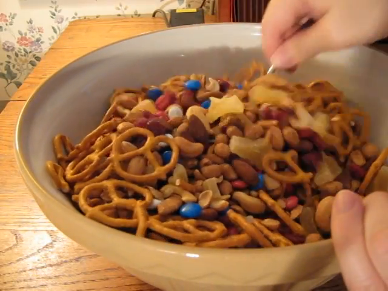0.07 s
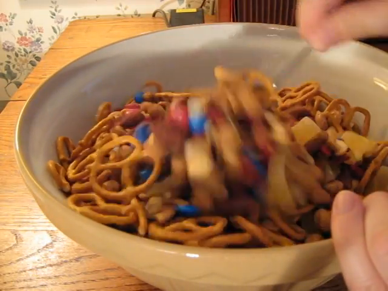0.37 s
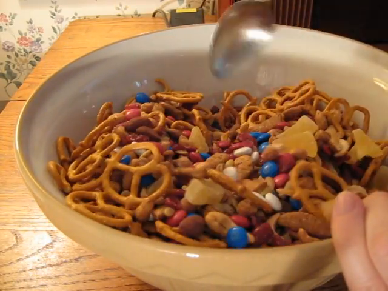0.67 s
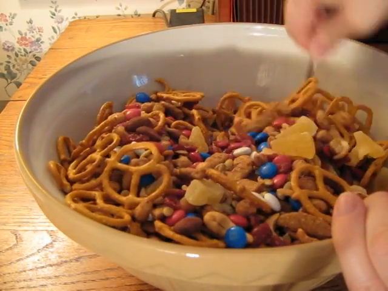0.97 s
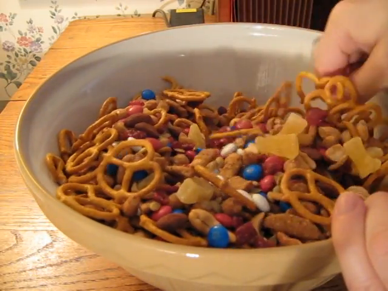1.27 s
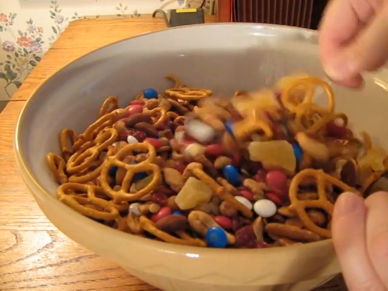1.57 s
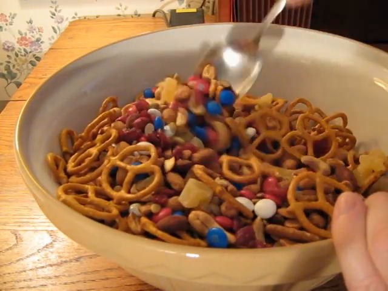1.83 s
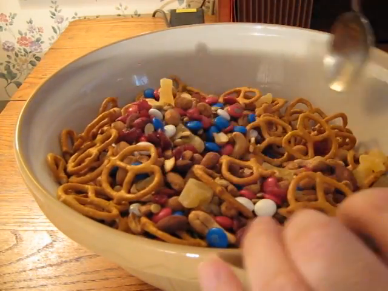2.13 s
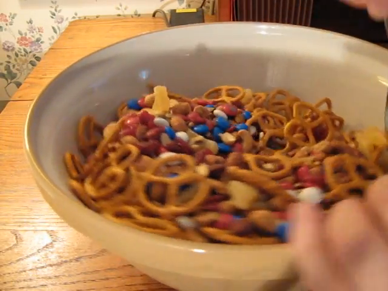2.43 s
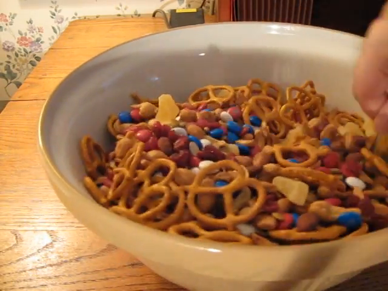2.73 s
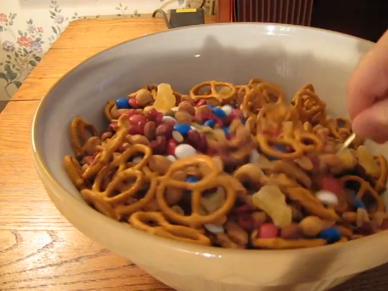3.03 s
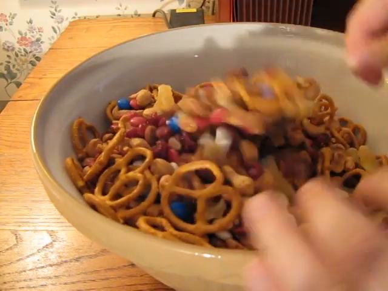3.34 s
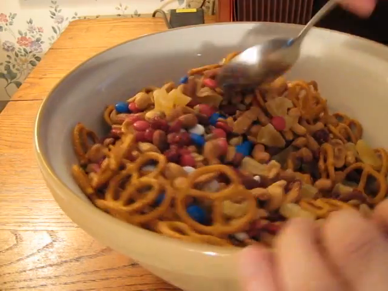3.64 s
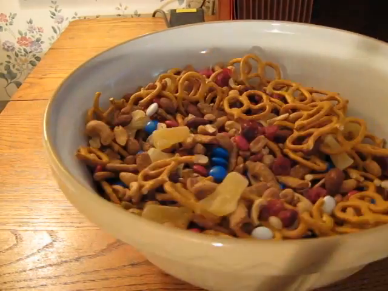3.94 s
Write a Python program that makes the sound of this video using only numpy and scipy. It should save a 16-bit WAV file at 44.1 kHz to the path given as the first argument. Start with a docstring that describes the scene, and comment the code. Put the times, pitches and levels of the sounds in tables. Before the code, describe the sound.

Pretzels, nuts and candies tumble in a ceramic bowl, stirred close by in a quiet room. Single pieces tick sharply and the spoon knocks the side. In the second half the bowl turns on the wooden table, then the pieces settle.

```python
"""In a small room, a steel spoon starts stirring nuts, pretzels and candies in a big ceramic bowl.
Each stroke sets off a dense tumble of tiny dry clicks, and single pieces snap or drop. Soon the
spoon clinks and knocks the bowl: both ring in their modes, and the bowl thumps the wooden table.
Midway a hand turns the bowl, whose foot rubs on the wood by stick-slip friction as stirring goes on.
At the end the pieces settle and the bowl gets a last nudge."""
import sys
import numpy as np
from scipy import signal
from scipy.fft import rfft, irfft, next_fast_len
from scipy.io import wavfile
from scipy.ndimage import uniform_filter1d, map_coordinates

SR = 44100
rng = np.random.default_rng(int(sys.argv[2]) if len(sys.argv) > 2 else 0)


def generate_wav(signal):
    """Clip the signal to [-1, 1] and save it as 16-bit WAV at the path in sys.argv[1]."""
    frames = np.transpose(np.atleast_2d(signal))
    scaled = np.clip(frames, -1, 1) * 32767
    pcm = np.round(scaled).astype(np.int16)
    wavfile.write(sys.argv[1], SR, pcm)


N = 176400

# Flow of pieces, one list per stretch of stirring, then the settling: time_s, relative_level_db
STROKE_FLOW = [
    [(0.0, -42.5), (0.014, -37.5), (0.094, -42), (0.1, -35), (0.17, -30), (0.192, -41), (0.2, -36)],
    [(0.215, -44), (0.247, -51.5), (0.259, -45.5), (0.317, -38), (0.331, -41.5), (0.347, -38.5),
     (0.53, -36)],
    [(0.57, -51), (0.626, -42.5), (0.632, -60.5), (0.64, -47.5), (0.678, -45.5), (0.688, -54), (0.77, -55)],
    [(0.88, -44.5), (0.926, -48), (1.084, -39.5), (1.132, -33.5), (1.14, -43), (1.238, -41.5),
     (1.285, -63.5)],
    [(1.305, -39.5), (1.311, -44.5), (1.435, -31.5), (1.527, -33.5), (1.533, -38), (1.589, -32),
     (1.61, -49.5)],
    [(1.62, -43.5), (1.676, -43.5), (1.714, -34), (1.772, -41), (1.874, -37), (1.882, -41.5), (1.98, -38.5)],
    [(2.0, -39), (2.092, -51), (2.096, -39.5), (2.162, -59.5), (2.172, -43), (2.196, -49.5), (2.275, -61.5)],
    [(2.42, -51), (2.442, -64), (2.47, -34), (2.486, -48.5), (2.518, -34.5), (2.748, -35), (2.8, -43)],
    [(2.83, -42), (2.97, -35), (2.976, -38), (3.04, -43.5), (3.1, -33.5), (3.11, -42.5), (3.235, -36)],
    [(3.265, -36.5), (3.335, -44.5), (3.387, -39), (3.395, -37.5), (3.419, -43), (3.591, -36),
     (3.67, -42.5)],
]
SETTLING_FLOW = [(3.71, -50.5), (3.882, -51), (4.0, -57.5)]
# The bowl's foot rubs in a long turn and a last nudge: time_s, relative_level_db
BOWL_TURN = [(2.2, -64), (2.372, -48.5), (2.558, -46.5), (2.774, -51), (2.924, -51.5), (3.472, -58),
             (3.75, -63)]
BOWL_NUDGE = [(3.975, -58), (3.986, -44), (4.0, -53)]
# Single pieces snap or drop: start_s, relative_peak_db, pitch_hz
SNAPS = [(0.0159, -18.5, 3740), (0.1037, -21.5, 2610), (0.1536, -14, 4400), (0.1682, -15.5, 4390),
         (0.2065, -16, 4000), (0.3956, -20.5, 2790), (0.514, -24, 3700), (0.9948, -21, 3850),
         (1.053, -22.5, 4580), (1.1059, -16, 3640), (1.125, -23, 4800), (1.1638, -22, 3300),
         (1.2323, -22.5, 3950), (1.2997, -23.5, 4450), (1.5804, -18, 3680), (1.588, -19, 3970),
         (1.7146, -18, 4120), (1.7479, -23, 4220), (1.799, -17.5, 4100), (1.8421, -22, 3800),
         (1.8686, -19, 4700), (1.953, -22, 3470), (1.9907, -14.5, 2660), (2.0398, -23, 3780),
         (2.06, -20.5, 3300), (2.08, -26, 3150), (2.0953, -21.5, 2640), (2.2865, -22, 3470),
         (2.4028, -9.5, 3160), (2.8989, -18, 2890), (2.9223, -18.5, 3630), (2.974, -20, 4550),
         (2.9852, -16.5, 3350), (3.0984, -16, 3780), (3.2486, -14, 3690), (3.2996, -18.5, 3620),
         (3.3944, -18.5, 3960), (3.5536, -21, 3630), (3.798, -16.5, 3700), (3.8122, -16, 3300),
         (3.898, -25, 3620)]
# Blows that ring the spoon: start_s, ring_db, scrape_db, thump_db
SPOON_CLINKS = [(.329, -30.5, -30.5, -58), (.540, -29, -48, -66), (.550, -26.5, -31, -46.5),
                (0.591, -36, -39, -57), (.596, -38, -33, -55), (.620, -38.5, -38.5, -65),
                (.645, -36.5, -36.5, -56), (.672, -37.5, -43, -61), (.782, -29, -34.5, -73),
                (0.793, -31.5, -44, -53), (0.84, -28, -24.5, -59), (0.919, -38.5, -49.5, -58.5),
                (1.260, -38.5, -51, -50.5), (2.169, -40.5, -42, -73), (2.611, -29.5, -34.5, -39),
                (2.679, -23, -39, -57.5), (2.739, -44, -31, -39), (3.508, -32, -30, -54),
                (3.598, -27, -38.5, -62), (3.683, -31, -28, -37.5), (3.822, -29.5, -31, -45),
                (3.858, -42.5, -31.5, -60), (3.918, -35.5, -35, -74)]
# Blows that ring the bowl: start_s, ring_db, scrape_db, thump_db, scrape_pitch_hz
BOWL_KNOCKS = [(.551, -28, -48.5, -49, 3200), (.833, -37, -28, -38.5, 4490), (.835, -24, -22, -44, 4270),
               (.846, -38.5, -26, -63, 4580), (2.403, -28.5, -27, -40, 3200),
               (2.528, -26.5, -27, -46, 4330), (2.566, -31, -32, -51, 3820), (2.817, -31.5, -29, -45, 3690),
               (3.247, -32.5, -23.5, -52, 3330), (3.777, -34, -31, -58, 4250),
               (3.814, -32.5, -28, -81.5, 4200)]
# Normal modes: frequency_hz, relative_level_db, t60_s
SPOON_MODES = [(1687, -13, .11), (2561, 2, 0.078), (2630, -8.5, 0.11), (3030, -10, .04), (3607, -6, 0.088),
               (4370, -19, .05), (4950, -16, 0.034), (6146, -20, .07)]
BOWL_MODES = [(351.7, -22.5, 0.25), (882.5, -13.5, .1), (1640, -13.5, 0.1), (2904, -4.5, 0.096),
              (3280, 0, .15), (3688, -5, 0.14), (4170, -8.5, 0.069), (4650, -10, 0.057), (4690, -7.5, .09),
              (4940, -5.5, 0.1), (6040, -20, 0.093)]
TABLE_MODES = [(283.7, -0.5, 0.33), (351, 3, 0.17), (589, -0.5, 0.24), (875, -1.5, 0.11)]
# Spectral shapes: frequency_hz, gain_db
PIECES_SPECTRUM = [(35, -51), (60, -13.5), (120, -7), (155, -24.5), (249, -13), (281, -9), (417, -14.5),
                   (671, -11), (1600, -9), (2630, -1.5), (4230, 0), (5050, -2), (6040, -13.5),
                   (6800, -28.5), (8840, -61), (15000, -120)]
FRICTION_SPECTRUM = [(60, -1), (170, -11.5), (280, -1), (360, -0.5), (470, -1), (600, 3.5), (900, -1),
                     (1600, -3.5), (3000, -19.5)]
BACKGROUND_SPECTRUM = [(15, -20), (25, 5), (97, -4.5), (238, -6), (651, -10), (1290, -9), (1520, -5),
                       (4460, -19.5), (6800, -43.5), (8840, -69.5), (15000, -120)]
THUMP_SPECTRUM = [(25, -0.5), (55, -1.5), (130, -6), (220, -14.5), (700, -14), (1500, -12.5), (4000, -43.5)]
# Steep treble cut that dulls the snaps and scrapes above about 5 kHz: frequency_hz, gain_db
TREBLE_ROLL_OFF = [(4900, -1), (6100, -6.5), (6800, -12.5), (8000, -39.5)]
# Reverberation time: frequency_hz, t60_s
ROOM_DECAY = [(100, 0.1), (1000, .3), (6000, 0.41)]

TOP_HZ = 7052  # upper edge of the band


def amp(db):
    """Amplitude grows tenfold every 20 decibels."""
    return 10 ** (np.asarray(db) / 20)


def unit_rms(x):
    """Normalisation to unit mean power."""
    return x / np.sqrt(np.mean(x ** 2) + 1e-20)


def at_frequency(points, hz):
    """Interpolation on a logarithmic frequency axis."""
    points_hz, values = np.transpose(points)
    return np.interp(np.log(hz + 1), np.log(points_hz + 1), values)


def curve(rows):
    """Linear interpolation in time, one value per sample."""
    return np.interp(np.arange(N) / SR, *np.transpose(rows))


def wobble(per_s):
    """Smooth fluctuation: a spline through random values."""
    return map_coordinates(rng.standard_normal(N // 100), [np.arange(N) * per_s / SR])


def colour(x, spectrum):
    """Minimum-phase filtering: folding the cepstrum makes the response causal."""
    size = 2 * next_fast_len(len(x) // 2 + 2048)
    gain = amp(at_frequency(spectrum, np.fft.rfftfreq(size, 1 / SR)))
    cepstrum = irfft(np.log(gain), size)
    cepstrum[1:size // 2] *= 2
    cepstrum[size // 2 + 1:] = 0
    return irfft(rfft(x, size) * np.exp(rfft(cepstrum)), size)[:len(x)]


def add(track, start_s, sound):
    """Superposition: a sound adds to the track from its start time."""
    i = max(round(start_s * SR), 0)
    track[i:i + len(sound)] += sound[:max(N - i, 0)]


def ring(modes, attack_s=0.00066, vary_db=1.2):
    """Free vibration: a sum of damped modes, excited a little differently at each strike."""
    t = np.arange(SR // 3) / SR
    tones = np.zeros(len(t))
    for hz, db, t60 in modes:
        envelope = amp(db + vary_db * rng.normal() - 60 * t / t60)
        tones += envelope * np.sin(2 * np.pi * (hz * t + rng.random()))
    return tones * (1 - np.exp(-t / attack_s))


def burst(envelope, hz, skirt_db):
    """A brief contact radiates broadband noise, strongest around one pitch."""
    shape = [(hz / 30, 2 * skirt_db), (hz / 4, 1.74 * skirt_db), (hz / 2, skirt_db),
             (hz / 0.77, -1), (hz * 0.94, 0), (hz * 2, 1.32 * skirt_db)]
    noise = rng.standard_normal(len(envelope)) * envelope
    return colour(colour(noise, shape), TREBLE_ROLL_OFF)


def room_noise(level_db=-53.5):
    """Stationary noise, strongest in the bass, forms the quiet background."""
    noise = colour(rng.standard_normal(N), BACKGROUND_SPECTRUM + [(TOP_HZ + 500, -60)])
    return amp(level_db) * unit_rms(noise)


def reverberation(x, delay_s=.004, gain_db=-10.5):
    """Diffuse reflections form a short tail that decays exponentially in each band."""
    hz, t, bands = signal.stft(rng.standard_normal(SR // 2), SR, nperseg=256)
    decay = amp(-60 * t / at_frequency(ROOM_DECAY, hz)[:, None])
    tail = signal.istft(bands * decay, SR, nperseg=256)[1]
    response = np.pad(tail / np.linalg.norm(tail), (round(delay_s * SR), 0))
    return amp(gain_db) * signal.fftconvolve(x, response)[:N]


def foot_rub(onset_s=.15, chatter_db=4.0, chatter_per_s=45, table_db=-5, gain_db=-0.5):
    """Stick-slip friction under the turning bowl drives the table's low modes."""
    level_db = curve([(BOWL_TURN[0][0] - onset_s, -90), *BOWL_TURN, *BOWL_NUDGE])
    noise = unit_rms(colour(rng.standard_normal(N), FRICTION_SPECTRUM + [(TOP_HZ, -60)]))
    friction = noise * amp(chatter_db * wobble(chatter_per_s))
    table = unit_rms(signal.fftconvolve(friction, ring(TABLE_MODES))[:N])
    return amp(level_db + gain_db) * (friction + amp(table_db) * table)


def spoon_blows(rows, modes, scrape_t60_s=0.031, thump_t60_s=.035):
    """Impact excitation: each blow rings the modes, grinds on pieces and thumps the table."""
    out, t = np.zeros(N), np.arange(SR // 3) / SR
    for start_s, ring_db, scrape_db, thump_db, pitch_hz in rows:
        scrape = burst(amp(-60 * t / scrape_t60_s), pitch_hz, skirt_db=-16)
        scrape *= amp(scrape_db) / scrape[:SR // 300].std()
        thump = colour(rng.standard_normal(len(t)) * amp(-60 * t / thump_t60_s), THUMP_SPECTRUM)
        thump *= amp(thump_db) / thump[:SR // 100].std()
        add(out, start_s, amp(ring_db) * ring(modes) + scrape + thump)
    return out


def snaps(crack_t60_s=.006, settle_db=-19, settle_t60_s=0.034, lag_s=.0007, gain_db=-2):
    """A transient with two decays: a piece cracks sharply, then its neighbours settle."""
    out, t = np.zeros(N), np.arange(SR // 40) / SR
    envelope = amp(-60 * t / crack_t60_s) + amp(settle_db - 60 * t / settle_t60_s)
    for start_s, peak_db, pitch_hz in SNAPS:
        crack = burst(envelope, pitch_hz, skirt_db=-14)
        add(out, start_s + lag_s, amp(peak_db + gain_db) * crack / np.abs(crack).max())
    return out


def collisions(flow_db, full_flow_per_s, scatter_db, full_flow_db=-34, click_hz=3800, t60_cycles=6.3):
    """A Poisson process of damped clicks, louder and denser as the flow grows."""
    rate = full_flow_per_s * amp(.5 * (flow_db - full_flow_db))
    chance, size, detune, phase = rng.random(N), rng.random(N), rng.standard_normal(N), rng.random(N)
    starts = np.flatnonzero(chance < rate / SR)
    offsets = np.arange(128)
    pitch_hz = np.clip(click_hz * np.exp(.3 * detune[starts, None]), 900, 6500)
    cycles = pitch_hz * offsets / SR
    clicks = amp(-60 * cycles / t60_cycles) * np.sin(2 * np.pi * (cycles + phase[starts, None]))
    clicks *= (amp(scatter_db * size[starts] ** 2) / np.sqrt(rate[starts]))[:, None]
    train = np.bincount((starts[:, None] + offsets).ravel(), clicks.ravel(), N)[:N]
    spectrum = rfft(train)
    smooth_power = np.abs(uniform_filter1d(np.abs(spectrum) ** 2, size=1500))
    whitened = irfft(spectrum / np.sqrt(smooth_power + 1e-12), N)
    return amp(flow_db) * unit_rms(colour(whitened, PIECES_SPECTRUM + [(TOP_HZ + 500, -60)]))


def rattle(pieces, modes, relative_db):
    """Forced vibration: the colliding pieces keep a body faintly ringing."""
    response = signal.fftconvolve(pieces, ring(modes))[:N]
    return amp(relative_db) * pieces.std() * unit_rms(response)


def tumble(avalanche_db=2, fine_db=1, coarse_db=-5):
    """Granular flow: crumbs and coarser pieces give way in little avalanches against spoon and bowl."""
    pause = [(2.39, -51)]  # the flow of pieces dips briefly
    rows = np.vstack([*STROKE_FLOW, pause, SETTLING_FLOW])
    flow_db = curve(rows[np.argsort(rows[:, 0])]) + avalanche_db * wobble(per_s=90)
    fine = collisions(flow_db, full_flow_per_s=3500, scatter_db=8.5)
    coarse = collisions(flow_db, full_flow_per_s=430, scatter_db=13)
    pieces = amp(fine_db) * fine + amp(coarse_db) * coarse
    spoon = rattle(pieces, SPOON_MODES, relative_db=-14.5)
    bowl = rattle(pieces, BOWL_MODES, relative_db=-23)
    return pieces + spoon + bowl


def scene(clink_scrape_hz=3660):
    """Direct sound, reverberation and room noise superpose at one point, alike in both channels."""
    clinks = [(*row, clink_scrape_hz) for row in SPOON_CLINKS]
    direct = tumble() + snaps()
    direct += spoon_blows(clinks, SPOON_MODES) + spoon_blows(BOWL_KNOCKS, BOWL_MODES)
    direct += foot_rub()
    mono = direct + reverberation(direct) + room_noise()
    return np.array([mono, mono])


def record(dry, knee_hz=6600):
    """Band limiting: two low-pass filters roll the treble off and end it steeply."""
    size = next_fast_len(N + SR // 2)
    hz = np.fft.rfftfreq(size, 1 / SR)
    roll_off = 1 / np.sqrt(1 + (hz / knee_hz) ** 50)
    steep_edge = 1 / np.sqrt(1 + (hz / TOP_HZ) ** 160)
    return irfft(rfft(dry, size) * roll_off * steep_edge, size)[:, :N]


dry = scene()
out = record(dry)
generate_wav(out)
```